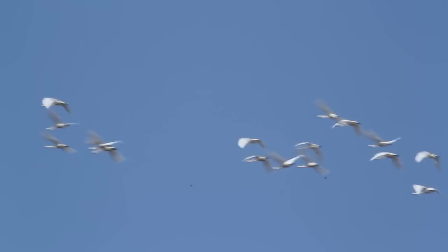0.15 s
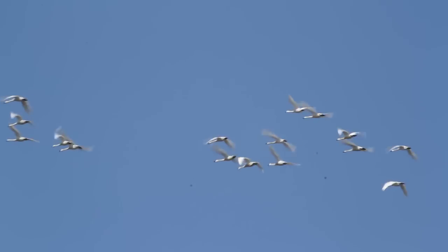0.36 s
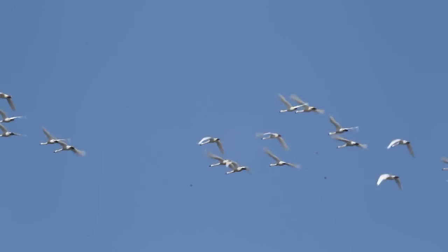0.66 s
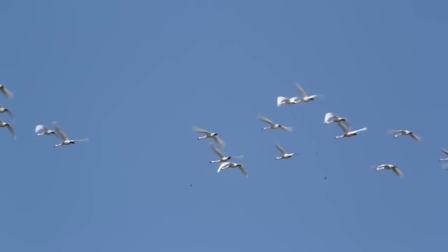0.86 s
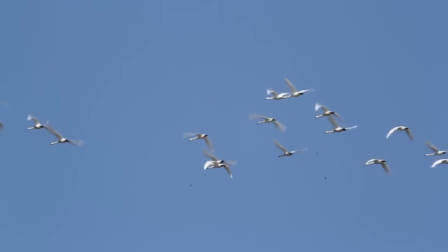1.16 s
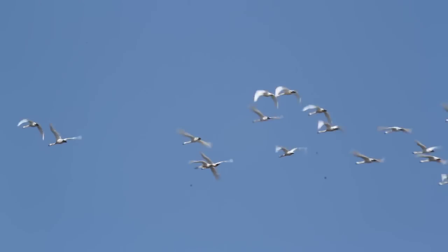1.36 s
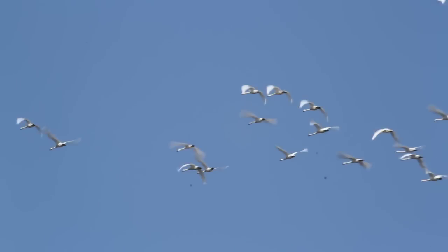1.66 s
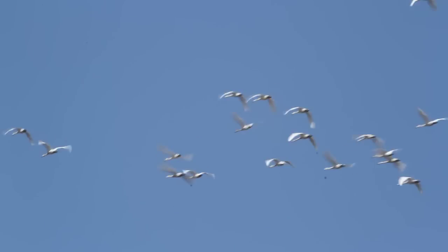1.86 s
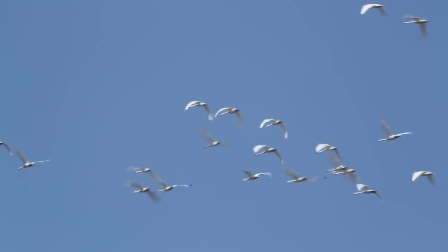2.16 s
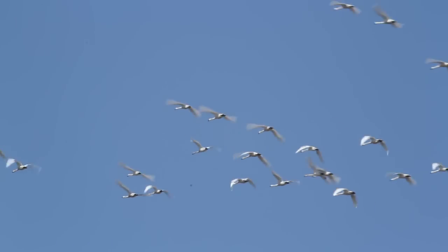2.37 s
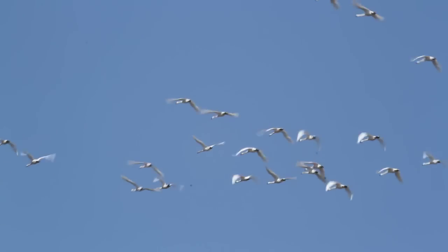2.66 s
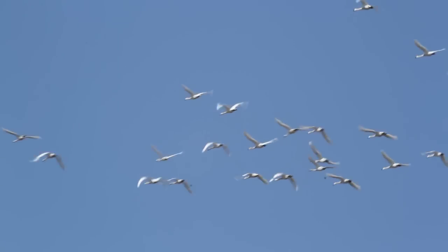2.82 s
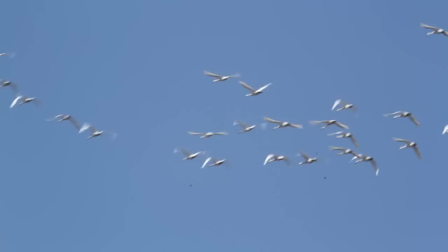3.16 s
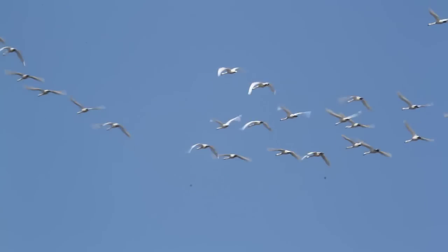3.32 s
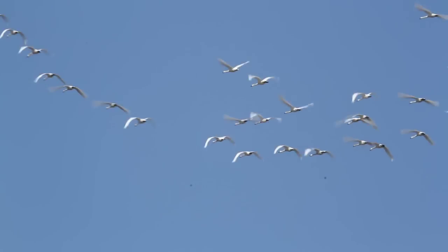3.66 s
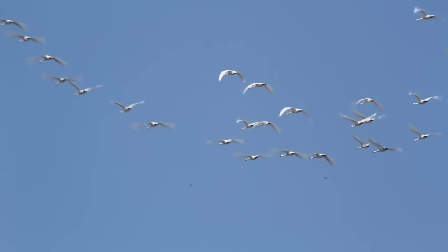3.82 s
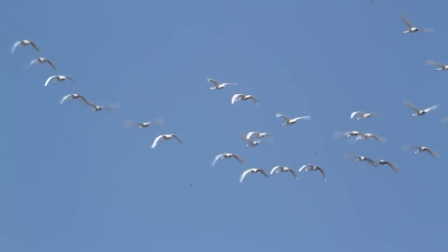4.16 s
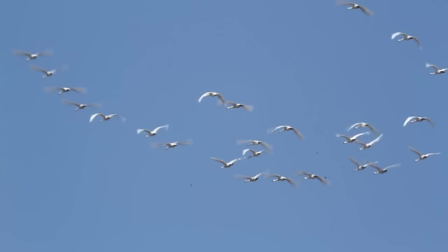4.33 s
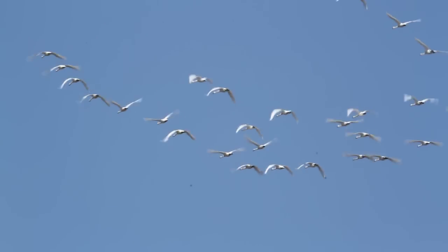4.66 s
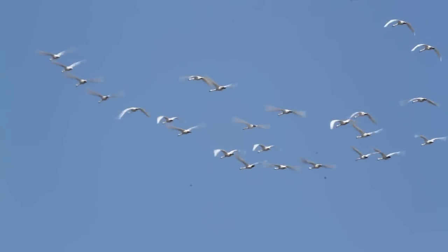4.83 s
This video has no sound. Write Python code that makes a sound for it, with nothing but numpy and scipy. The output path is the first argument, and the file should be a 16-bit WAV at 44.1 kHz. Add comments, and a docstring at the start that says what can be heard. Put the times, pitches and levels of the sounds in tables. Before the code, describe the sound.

Swans call in short, clear arched honks with low grunts and hoarse onsets as they pass over, while wind thumps low against the microphone.

```python
"""Swans fly over open country: clear arched notes in four voices, built from pitch-gliding overtones.
Low rising grunts and short rasps lead into some notes: pulses that ring throat resonances.
The land scatters the calls back as a faint noise tail. Wind buffets the microphone as lumps of low noise.
Far land noise and humming bands lie beneath; the camera ticks in short rung knocks, and noise hisses."""
import sys
import numpy as np
from scipy import signal
from scipy.fft import rfft, irfft, next_fast_len
from scipy.io import wavfile
from scipy.ndimage import map_coordinates

SR = 44100
rng = np.random.default_rng(int(sys.argv[2]) if len(sys.argv) > 2 else 0)


def store_wav(level_fs):
    """Save 16-bit WAV to argv[1]."""
    pcm = np.round(np.clip(np.atleast_2d(level_fs), -1, 1) * 32767)
    wavfile.write(sys.argv[1], SR, pcm.T.astype(np.int16))


N = 220026
TIME_S = np.arange(N) / SR


def amp(db):
    """Linear amplitude of a level in dB."""
    return 10 ** (np.asarray(db) / 20)


def unit(x):
    """x scaled to rms 1."""
    return x / np.sqrt(np.mean(x ** 2) + 1e-20)


def along(points, hz):
    """Values at hz between (f/Hz, value) points, on a log frequency axis."""
    f_hz, values = np.transpose(points)
    return np.interp(np.log(hz + 1), np.log(f_hz + 1), values)


def wobble(rate_hz, count=N):
    """Smooth random curve through rate_hz normal-random knots a second."""
    knots = rng.standard_normal(int(count * rate_hz / SR) + 4)
    return map_coordinates(knots, [np.arange(count) * rate_hz / SR])


def filtered(x, response):
    """x filtered by a complex response of frequency."""
    size = next_fast_len(x.shape[-1] + 8192)
    spectrum = rfft(x, size) * response(np.fft.rfftfreq(size, 1 / SR))
    return irfft(spectrum, size)[..., :x.shape[-1]]


def resonance(f, centre_hz, width_hz):
    """Response of one damped resonator, 1 at its centre."""
    damping = 1j * f * width_hz
    return damping / (centre_hz ** 2 - f * f + damping)


def resonances(modes):
    """Response of (f/Hz, width/Hz, level/dB) resonators summed with alternating sign."""
    return lambda f: sum((-1) ** k * amp(db) * resonance(f, centre_hz, width_hz)
                         for k, (centre_hz, width_hz, db) in enumerate(modes))


def noise(spectrum):
    """Noise of rms 1, coloured by (f/Hz, relative density/dB) points."""
    return unit(filtered(rng.standard_normal(N), lambda hz: amp(along(spectrum, hz))))


def edges(n):
    """Quick opening and slower closing of a call of n samples."""
    attack_s, release_s = 0.0085, 0.012
    t = np.arange(n) / SR
    return np.clip(np.minimum(t / attack_s, t[::-1] / release_s), 0, 1)


def sing(bird, length_s, first_hz, top_hz, last_hz, top, first_db, octave_db):
    """One arched note that fades as breath runs out; upper overtones ring fully only at the arch's top."""
    # by bird: fade over the note/dB, flicker/dB, 3rd and 4th harmonic re stronger of first two/dB
    voices = {"high": (10, 1.7, -16, -22), "middle": (12.5, 1.5, -23, -40), "low": (4, 2.5, -19, -19),
              "far": (0, 2.5, -19, -40)}
    rise_power = 2.1  # pitch climbs quickly, then rounds off
    slack_db_per_share = 180  # upper overtone loss per share of pitch below the top
    octave_slack = 0.13  # share of that loss taken by the octave
    fade_db, flicker_db, *upper_db = voices[bird]
    n, top = round(length_s * SR), np.clip(top, .02, .98)
    u = np.linspace(0, 1, n)
    rising_hz = top_hz - (top_hz - first_hz) * np.abs(1 - u / top) ** rise_power
    falling_hz = top_hz - (top_hz - last_hz) * ((u - top) / (1 - top)) ** 2
    hz = np.where(u < top, rising_hz, falling_hz)
    wavered_hz = hz * (1 + 0.006 * wobble(70, count=n))  # moving air wavers the pitch
    phase = 2 * np.pi * np.cumsum(wavered_hz) / SR
    slack_db = slack_db_per_share * np.abs(1 - hz / top_hz)
    levels_db = [first_db, octave_db - octave_slack * slack_db]
    levels_db += [max(first_db, octave_db) + db - slack_db for db in upper_db]
    tones = [amp(db + flicker_db * wobble(51, count=n)) * np.sin(k * phase + rng.uniform(0, 2 * np.pi))
             for k, db in enumerate(levels_db, start=1)]
    return np.sqrt(2) * edges(n) * amp(-fade_db * u ** 2) * sum(tones)


def swans():
    """Clear notes in four voices, each with its own balance of overtones."""
    # notes: bird, t/s, length/s, first f/Hz, top f/Hz, last f/Hz, place of top (0-1),
    # fundamental level/dB, octave level/dB (both before fade and flicker)
    notes = [("far", 0.0, .13, 670, 870, 830, .55, -55.5, -75),
             ("far", .135, 0.063, 815, 820, 715, .1, -50.5, -75),
             ("middle", .19, .15, 680, 650, 635, 0.31, -48, -59),
             ("high", .352, .11, 765, 840, 765, .38, -47.5, -42.5),
             ("far", .745, 0.189, 640, 778, 690, 0.398, -43, -70),
             ("low", .878, .125, 480, 524, 490, .5, -63, -44.5),
             ("high", 1.372, .12, 800, 851, 745, 0.29, -44.5, -43),
             ("middle", 1.48, .055, 647, 660, 640, .4, -45.5, -53),
             ("low", 1.5, 0.11, 488, 514, 470, 0.67, -64, -39),
             ("low", 1.602, .12, 430, 510, 490, 0.426, -65, -43),
             ("far", 1.805, .125, 680, 860, 850, 0.97, -52.5, -75),
             ("far", 1.94, .09, 785, 790, 665, .05, -49, -68),
             ("middle", 2.118, 0.097, 635, 657, 585, .3, -38, -46),
             ("high", 2.368, .128, 780, 852, 770, .36, -41.5, -43),
             ("middle", 2.782, 0.1, 645, 655, 587, 0.32, -36, -33),
             ("high", 3.35, .135, 780, 845, 735, .36, -40.5, -40.5),
             ("middle", 3.615, 0.15, 622, 656, 615, 0.44, -38.5, -33),
             ("high", 4.358, .105, 785, 845, 755, 0.35, -43.5, -50),
             ("middle", 4.47, 0.052, 635, 650, 610, .5, -49.5, -42)]
    out = np.zeros(N)
    for bird, start_s, *note in notes:
        voice = sing(bird, *note)
        out[round(start_s * SR):][:len(voice)] += voice
    return out


def echoes(x):
    """Fields and far trees scatter the calls back as a dying haze."""
    t60_s, build_s = 0.69, 0.026
    t = np.arange(SR // 2) / SR
    tail = rng.standard_normal(len(t)) * amp(-60 * t / t60_s) * np.clip(t / build_s, 0, 1)
    return signal.fftconvolve(x, tail / np.linalg.norm(tail))[:N]


def wind():
    """Eddies press on the microphone in lumps; the right port feels the deep ones a shade more."""
    # wind between thumps: t/s, deep level/dB, upper level/dB (before random wobble)
    lulls = [(0.0, -33.5, -35.5), (0.22, -31.5, -34), (0.39, -31.5, -31.5), (1.11, -30, -34.5),
             (1.28, -31, -34), (1.54, -29, -33), (1.81, -39.5, -37), (2.56, -40, -36), (3.25, -36.5, -35),
             (3.4, -33, -33.5), (3.81, -40.5, -34), (4.06, -39.5, -38), (4.67, -35, -36),
             (4.99, -38, -39.5)]
    # strong eddies: peak t/s, half-length/s, deep peak level/dB, upper peak level/dB
    eddies = [(0.0, 0.019, -23, -23.5), (.28, 0.029, -28.5, -27.5), (0.333, 0.021, -21, -22),
              (0.456, 0.025, -33, -29), (0.613, 0.02, -24, -18.5), (0.869, 0.027, -22.5, -24.5),
              (0.943, 0.014, -31, -27.5), (1.052, 0.051, -21.5, -35), (1.306, .025, -29, -32.5),
              (1.57, .025, -27.5, -34), (1.677, 0.022, -27.5, -27), (1.868, .015, -36, -32),
              (1.975, 0.013, -35, -31), (2.066, .025, -34, -46), (2.566, 0.023, -35, -37),
              (3.066, 0.017, -32, -38.5), (3.225, 0.017, -26, -20), (3.357, 0.035, -21.5, -30),
              (3.61, 0.048, -28, -36), (4.724, 0.013, -33, -25.5), (4.783, .03, -26, -35),
              (4.99, 0.019, -29, -38)]
    # buffet spectra: f/Hz, relative density/dB
    deep_spectrum = [(8.8, -33), (15, -18), (43, 2.5), (90, -1.5), (120, -16.5), (200, -120)]
    upper_spectrum = [(35, -38), (60, -8), (94, -2.5), (174, -7), (280, -18.5), (333, -24.5), (400, -33),
                      (520, -83), (880, -120)]
    lull_s, deep_db, upper_db = np.transpose(lulls)
    peak_s, half_s, *thump_db = np.transpose(eddies)
    bumps = np.exp(-((TIME_S - peak_s[:, None]) / half_s[:, None]) ** 2)
    deep_thumps, upper_thumps = amp(thump_db) @ bumps
    deep_level = amp(np.interp(TIME_S, lull_s, deep_db) + 2.94 * wobble(12)) + deep_thumps
    upper_level = amp(np.interp(TIME_S, lull_s, upper_db) + 2.4 * wobble(14)) + upper_thumps
    deep = deep_level * noise(deep_spectrum)
    upper = upper_level * noise(upper_spectrum)
    return deep * amp([[-.12], [.12]]) + upper


def land():
    """Far broad noise with a few humming bands whose levels waver slowly and quickly."""
    # far noise spectrum: f/Hz, relative density/dB
    distance = [(71, -77), (120, -6), (228, -18.5), (279, -10.5), (311, -15.5), (497, -16), (554, -25),
                (1030, -31.5), (1290, -30), (2020, -40.5), (5000, -50), (6500, -76), (11000, -120)]
    # humming bands: f/Hz, resonator width/Hz, rms level before wobble/dB
    drone = [(272.4, 34, -46), (503.8, 58.4, -45), (803.6, 35, -63), (1304, 132, -60.5), (3495, 760, -68.5)]
    out = amp(-42 + 0.27 * wobble(4.13)) * noise(distance)
    for centre_hz, width_hz, db in drone:
        band = filtered(rng.standard_normal(N), lambda f: resonance(f, centre_hz, width_hz) ** 2)
        out += amp(db + 1.56 * wobble(4.996) + 2.05 * wobble(30)) * unit(band)
    return out


def pulses(hz, rough):
    """Membrane pulses as an even stack of harmonics 2-15, randomly wavering in pitch and size."""
    drift = rough * wobble(190, count=len(hz))
    phase = 2 * np.pi * np.cumsum(hz * (1 + 0.13 * drift)) / SR
    stack = np.cos(np.arange(2, 16)[:, None] * phase).sum(0)
    return stack * amp(16 * rough * wobble(243, count=len(hz)))


def rasps():
    """Short hoarse pulses before the voice locks on to its note, ringing the windpipe at three places."""
    # t/s, length/s, first pulse rate/Hz, level before envelope/dB, throat f/Hz, upper ring/dB
    bursts = [(.262, 0.076, 140, -45.5, 1120, -2), (0.348, 0.028, 155.4, -47, 1130, 0),
              (.87, 0.033, 148, -53, 1000, 7), (1.359, 0.029, 159, -46.5, 1080, -7),
              (1.477, 0.043, 148.5, -44, 800, -3), (2.078, 0.065, 135.5, -40.5, 1010, -4),
              (2.361, 0.028, 161, -47, 1060, -5), (2.754, 0.047, 137.7, -40.5, 994, 2),
              (3.339, 0.029, 156, -45, 1000, 5), (3.601, 0.062, 136.4, -45, 1000, 3),
              (4.35, 0.033, 162, -47, 990, 6), (4.46, 0.031, 136.6, -52, 980, -6)]
    rise = 0.066  # climb of the pulse rate, as a share
    out = np.zeros(N)
    for start_s, length_s, first_hz, db, centre_hz, upper_db in bursts:
        n = round(length_s * SR)
        pipe = resonances([(650, 300, -8), (centre_hz, 70, 8), (1390, 220, upper_db)])
        hz = first_hz * (1 + np.linspace(0, rise, n))
        # four one-pole low-passes at 1500 Hz dull the rung pulses
        voice = filtered(pulses(hz, rough=.16), lambda f: pipe(f) / (1 + 1j * f / 1500) ** 4)
        out[round(start_s * SR):][:n] += amp(db) * unit(voice) * np.hanning(n) ** 0.38
    return out


def ticks():
    """Tiny plastic ticks of the camera body, unequal on the two sides; sharp ones carry more treble."""
    # t/s, peak level/dB, treble tilt/(dB per octave)
    knocks = [(0.7738, -40, -11), (0.8116, -40, -4), (0.8891, -35, 8), (1.4804, -39, 0.5), (3.8176, -38, 1),
              (4.8212, -30.5, -3)]
    # camera body resonances: f/Hz, width/Hz, level/dB
    shell = [(3550, 500, 3.5), (4950, 470, -0.5), (11900, 5500, -15)]
    t60_s = 0.0087
    body = resonances(shell)
    out, t = np.zeros((2, N)), np.arange(600) / SR
    for start_s, db, tilt_db in knocks:
        knock = rng.standard_normal((2, len(t))) * amp(-60 * t / t60_s)
        knock = knock + 3.7 * knock.mean(0)  # part common to both sides
        snap = filtered(knock, lambda f: body(f) * amp(tilt_db * np.log2(f / 3600 + .01)))
        out[:, round(start_s * SR):][:, :len(t)] += amp(db) * snap / np.abs(snap).max()
    return out


def grunts():
    """Slow, nearly regular pulses through the long windpipe, rising and swelling."""
    # t/s, length/s, last f/Hz, last level before closing/dB
    calls = [(1.17, 0.2, 181, -56.5), (2.22, 0.15, 185.5, -52.5), (2.581, 0.19, 158, -51.5),
             (3.19, 0.15, 182.5, -51), (3.421, .19, 198.3, -50.5), (4.201, 0.17, 183, -53)]
    # windpipe resonances: f/Hz, width/Hz, level/dB
    windpipe = [(777, 87, -7), (1040, 300, -13), (1358, 62, 1)]
    rise, swell_db = .085, 8  # pitch starts this share, level this much, below its last value
    out = np.zeros(N)
    for start_s, length_s, last_hz, db in calls:
        left = np.linspace(1, 0, round(length_s * SR))
        source = pulses(last_hz * (1 - rise * left), rough=.05)
        voice = unit(filtered(source, resonances(windpipe)))
        level = edges(len(left)) * amp(db - swell_db * left ** 2)
        out[round(start_s * SR):][:len(left)] += level * voice
    return out


def scene():
    """Calls with their faint echo, over land, wind and ticks."""
    calls = swans() + grunts() + rasps()
    return calls + amp(-17.0) * echoes(calls) + land() + wind() + ticks()


def record(dry):
    """Each channel adds its own hiss and a small offset; nothing is kept above the band limit."""
    # hiss spectrum: f/Hz, relative density/dB
    hiss_spectrum = [(90, -60), (200, -28), (300, -11), (500, -2), (2000, -2.5), (2500, -1.5), (9000, -1.5),
                     (15700, -2.5)]
    top_hz = 15730
    hiss = amp(-52) * np.array([noise(hiss_spectrum), noise(hiss_spectrum)])
    return filtered(dry + hiss, lambda hz: hz < top_hz) + [[.0062], [.0092]]


dry = scene()
out = record(dry)
store_wav(out)
```